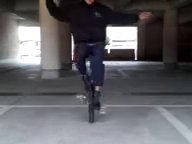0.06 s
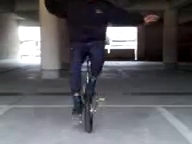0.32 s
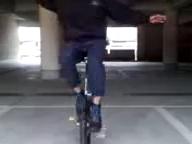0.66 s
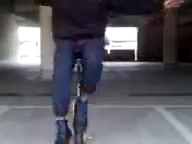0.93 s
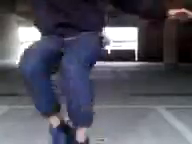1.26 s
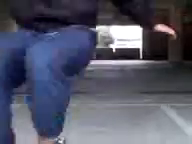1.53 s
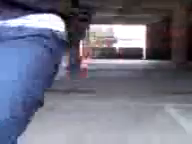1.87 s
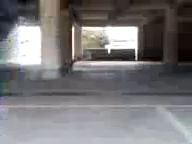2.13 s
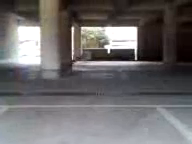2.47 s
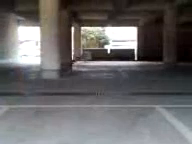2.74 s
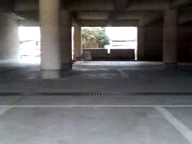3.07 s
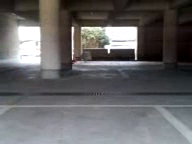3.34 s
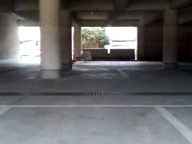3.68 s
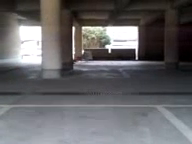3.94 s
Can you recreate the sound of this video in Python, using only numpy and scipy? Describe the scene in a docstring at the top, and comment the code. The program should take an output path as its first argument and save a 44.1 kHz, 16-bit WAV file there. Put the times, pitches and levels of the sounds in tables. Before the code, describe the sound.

A unicycle rolls closer in a concrete parking garage, its tyre crackling on grit with each pedal stroke while the frame ticks. Rubber squeaks close by at about 1.4 seconds and again, loudest, near 2.2 seconds, with a few knocks. Soft footfalls follow from 2.5 seconds, then last scuffs and ticks around 3 seconds. Everything echoes over a steady rush of room noise that continues to 4 seconds.

```python
"""A unicycle rolls past a microphone in a concrete parking garage full of steady air noise.
First the tyre crackles over grit and swells with each pedal stroke, while the loaded frame ticks.
From 1.4 s rubber scuffs close by in stick-slip squeaks, loudest near 2.2 s; then feet thud behind,
and last scuffs and ticks follow near 3 s. Throughout, the concrete reverberates, and the narrow-band
recorder ducks after each loud sound and slowly lets the room noise back up."""
import sys
import numpy as np
from scipy import signal
from scipy.fft import rfft, irfft, next_fast_len
from scipy.io import wavfile
from scipy.ndimage import uniform_filter1d

SR = 44100
rng = np.random.default_rng(int(sys.argv[2]) if len(sys.argv) > 2 else 0)


def transcribe(signal):
    """Save signal, clipped to [-1, 1], as a 16-bit WAV file at the path in sys.argv[1]."""
    frames = np.atleast_2d(signal).T
    limited = np.clip(frames, -1, 1)
    pcm = np.round(limited * 32767).astype(np.int16)
    wavfile.write(sys.argv[1], SR, pcm)


N = 176400

# Loudness of the rolling tyre. Each row: time in seconds, level in dB.
ROLL_LEVEL = [(0, -27.5), (.4, -27.5), (.7, -27), (1.28, -29), (1.45, -19.5), (1.65, -31.5), (2.05, -47.5),
              (2.25, -15), (2.45, -26.5), (2.8, -57), (3.15, -28), (3.6, -55), (4, -26.5)]
# Spectrum of the tread on grit. Each row: frequency in Hz, spectral density in dB.
TYRE_SPECTRUM = [(100, -18), (400, -6), (1000, -22), (1700, -10.5), (2100, -2), (2600, -3.5), (3000, -2),
                 (3350, 4.5), (3600, -2)]
# Pedal strokes. Each row: start in seconds, length in seconds, level in dB, relative ring level in dB.
PEDAL_STROKES = [(0, 0.12, -21, -12.5), (0.229, 0.28, -20.5, -12), (0.492, 0.1, -19, -9.5),
                 (0.795, 0.16, -21, 2), (1.06, 0.12, -22.5, -11), (1.635, 0.1, -21.5, -12)]
STROKE_RISE_S, RING_HZ, RING_SAG_HZ_PER_S, RING_WIDTH_HZ = 0.018, 3406, 2000, 170

# Rubber scuffs. Each row: start, rise, hold and release in seconds, level in dB, squeak pitch in Hz,
# relative scrape level in dB.
SCUFFS = [(1.372, 0.0015, 0.013, 0.035, -6.5, 3206, -11.5),
          (2.096, 0.0021, 0.024, 0.012, -9.5, 3043, -12.5), (2.17, 0.018, 0.01, 0.017, -1.5, 3206, -9.5),
          (2.921, 0.0052, 0.025, 0.18, -21, 2960, -16), (2.976, 0.011, 0.02, 0.036, -14.5, 2960, -9.5),
          (3.083, 0.012, 0.0037, 0.032, -17.5, 3060, -4)]
# Broad scrape under a squeak. Each row: frequency in Hz, spectral density in dB.
SCRAPE_SPECTRUM = [(60, -25), (300, 1.5), (650, -6), (1000, 1), (1350, 4), (1800, 1.5), (2400, 7.5),
                   (3500, -19.5)]
SLIP_RATE_HZ, SLIP_RISE_S, SLIP_SPREAD_DB, SLIP_DETUNE = 380, 0.00082, 2.4, 0.036

# Frame ticks. Each row: start in seconds, level in dB, relative level of the lower modes in dB.
TICKS = [(0.2357, -8, 1), (.244, -6.5, -1), (0.364, -12.5, -17), (0.444, -12.5, -4), (0.513, -11.5, -6.5),
         (0.54, -4.5, -10.5), (.554, -10, -10), (.750, -11, -9), (0.799, -2, -4.5), (1.0659, -10, 1.5),
         (1.089, -7, -5), (1.137, -4, -8), (1.2715, -12, -6.5), (1.2964, -9.5, -7.5), (1.3233, -1, -12),
         (1.3335, -3.5, -15.5), (1.35, -4, -15.5), (1.8614, -13, -3), (1.8637, -10, -5),
         (2.209, -6.5, -1.5), (2.9309, -3.5, -5.5), (2.9392, -4, -14), (2.9552, -9.5, -4),
         (2.9854, -1.5, -20), (2.988, 3, -16.5), (2.9966, 3.5, -10.5), (3.0172, -8, -2)]
# Main frame mode, lower once the rider is past. Each row: time in seconds, frequency in Hz.
FRAME_MAIN_MODE = [(1.4, 3312), (2.9, 2844)]
# Lower frame modes. Each row: frequency in Hz, relative level in dB.
FRAME_LOW_MODES = [(971, -4), (1600, -5.5), (2050, 5)]
TICK_RISE_S, TICK_DETUNE = 0.00085, 0.019

# Soft knocks, clacks and footfalls. Each row: start in seconds, level in dB, pitch in Hz,
# 60 dB decay time in seconds, relative slap level in dB, relative boom level in dB.
KNOCKS = [(0.482, -17, 275, 0.046, -1, -7.5), (0.7982, -16.5, 910, .06, -16.5, -25),
          (1.135, -18.5, 588, 0.12, -9.5, -9.5), (1.644, -16, 623, 0.029, 3.5, -10),
          (1.895, -26.5, 327, 0.28, -2.5, 1), (2.096, -10, 922, 0.036, -4, -21.5),
          (2.148, -5, 607, 0.017, 3, -30), (2.1969, -6, 1326, 0.041, -2.5, -25.5),
          (2.556, -18.5, 240, 0.17, -4.5, -4.5), (2.578, -23, 291, 0.054, -3, -5.5),
          (2.621, -27.5, 329, 0.089, -3.5, -3), (2.695, -14.5, 321, .11, 0.5, -15.5),
          (2.818, -29, 318, 0.16, -12.5, -4.5)]
# Slap of a sole. Each row: frequency in Hz, spectral density in dB.
SLAP_SPECTRUM = [(40, -26.5), (170, -12.5), (350, -10), (800, 0), (1350, 4), (1900, -9.5), (3300, -5)]
# Hollow boom under a knock. Each row: frequency in Hz, spectral density in dB.
BOOM_SPECTRUM = [(40, -19.5), (150, -9.5), (240, -5.5), (340, -2.5), (500, -5.5), (1000, -22.5),
                 (2000, -21.5)]
KNOCK_ATTACK_S, SLAP_T60_S, BOOM_T60_S = 0.001, 0.016, 0.34
THUD_WANDER_HZ, THUD_BASS_CUT_HZ = 18, 120

# Reverberation time of the garage. Each row: frequency in Hz, 60 dB decay time in seconds.
GARAGE_T60 = [(150, 0.97), (1000, 4.4), (3500, 1.0)]
NEAR_WET_DB, KNOCK_WET_DB = -10, -11.5
# Loudness of the room noise. Each row: time in seconds, level in dB.
AIR_LEVEL = [(0, -24.5), (.55, -25.5), (.95, -28), (1.3, -27), (1.55, -30), (2.05, -25.5), (2.3, -25),
             (2.5, -23), (2.69, -21.5), (2.73, -28.5), (2.93, -27), (3.2, -26), (3.32, -26.5), (3.6, -23),
             (4, -23)]
# Spectrum of the room noise. Each row: frequency in Hz, spectral density in dB.
AIR_SPECTRUM = [(22, -37), (50, -12.5), (100, -6), (180, -6.5), (320, 0), (550, 3.5), (1000, 5),
                (1450, 2.5), (1800, 3.5), (2200, 9), (2650, 2.5), (3400, 0.5)]

# Frequency response of the recorder. Each row: frequency in Hz, gain in dB.
RECORDER_BAND = [(18, -15.5), (45, 2.5), (3400, 1), (3650, -6), (3900, -14.5), (4350, -26.5), (4750, -55.5),
                 (5300, -100)]
INPUT_BAND_HZ, TOP_HZ = 4764, 15800
LIMIT_DB, DUCK_ATTACK_S, RECOVER_DB_PER_S, CLIP_LEVEL = -12.5, 0.012, 24, 0.4
# Thin, bright spits. Each row: start in seconds, level before filtering in dB.
SPITS = [(0.799, -23), (2.1868, -21), (2.1927, -19), (2.1955, -13), (2.99, -21.5)]
SPIT_LOW_HZ, SPIT_TOP_HZ, SPIT_T60_S = 1400, 14600, 0.00034


def tyre():
    """Rolling noise: tread strikes grit; each pedal stroke swells it and draws a squeaky ring."""
    t = clock()
    out = envelope(ROLL_LEVEL) * coloured(grains(per_second=1500, spread_db=2.5), TYRE_SPECTRUM)
    crunch = coloured(grains(per_second=3600, spread_db=-1.5), TYRE_SPECTRUM)
    flutter = unit_rms(filtered(rng.standard_normal(N), lambda hz: 1 / (1 + (hz / RING_WIDTH_HZ) ** 4)))
    for start, length, db, ring_db in PEDAL_STROKES:
        pitch = RING_HZ - RING_SAG_HZ_PER_S * np.clip(t - start, 0, length)  # sinks as the push eases
        ring = unit_rms(flutter * tone(pitch))
        swell = np.interp(t, [start, start + STROKE_RISE_S, start + length], [0, 1, 0])
        out += amp(db) * swell * (crunch + amp(ring_db) * ring)
    return out


def rubber_scuffs():
    """Stick-slip friction: rubber catches and lets go in an uneven pulse train over a broad scrape."""
    t, out = clock(), np.zeros(N)
    scrape = coloured(grains(per_second=3800, spread_db=8.0), SCRAPE_SPECTRUM)
    for start, rise, hold, release, db, hz, scrape_db in SCUFFS:
        slips = np.zeros(N)
        for k, (jitter, size, detune) in enumerate(rng.standard_normal(size=(80, 3))):
            slip = amp(SLIP_SPREAD_DB * size) * damped_pulse(hz * (1 + SLIP_DETUNE * detune), SLIP_RISE_S)
            add(slips, start + (k + 0.26 * jitter) / SLIP_RATE_HZ, slip)
        squeak = slips / np.std(slips[slips != 0])
        swell = np.interp(t, start + np.cumsum([0, rise, hold, release]), [0, 1, 1, 0]) ** 2
        out += amp(db) * swell * (squeak + amp(scrape_db) * scrape)
    return out


def frame_ticks():
    """Modal vibration: the loaded frame and cranks creak in single, heavily damped ticks."""
    out = np.zeros(N)
    for start, db, low_db in TICKS:
        pitch = np.interp(start, *np.transpose(FRAME_MAIN_MODE))
        main = damped_pulse(pitch * (1 + TICK_DETUNE * rng.standard_normal()), TICK_RISE_S)
        low = sum(amp(mode_db) * damped_pulse(hz * rng.lognormal(0, 0.053), TICK_RISE_S / 2)
                  for hz, mode_db in FRAME_LOW_MODES)
        add(out, start, amp(db) * (main + amp(low_db) * low))
    return out


def knocks():
    """Impact excitation: each contact leaves a wavering ring, a hollow boom and a slap to decay."""
    out, t = np.zeros(N), np.arange(SR // 2) / SR
    slap_noise = coloured(rng.standard_normal(N), SLAP_SPECTRUM)
    boom_noise = coloured(rng.standard_normal(N), BOOM_SPECTRUM)
    for start, db, hz, t60, slap_db, boom_db in KNOCKS:
        span = slice(round(start * SR), round(start * SR) + len(t))
        wander = unit_rms(uniform_filter1d(rng.standard_normal(len(t)), size=300))
        ring = amp(-60 * t / t60) * tone(hz + THUD_WANDER_HZ * wander)
        boom = boom_noise[span] * amp(boom_db - 60 * t / BOOM_T60_S)
        slap = slap_noise[span] * amp(slap_db - 60 * t / SLAP_T60_S)
        attack = 1 - np.exp(-t / KNOCK_ATTACK_S)
        add(out, start, amp(db) * ((ring + boom) * attack + slap))
    return filtered(out, lambda hz: (1j * hz / (1j * hz + THUD_BASS_CUT_HZ)) ** 2)


def garage_reverb(x):
    """Diffuse reverberation: reflections off bare concrete decay exponentially, mid pitches slowest."""
    hz, t, spectra = signal.stft(rng.standard_normal(SR * 2), SR, nperseg=256)
    decay = amp(-60 * t / curve_at(GARAGE_T60, hz)[:, None])
    tail = signal.istft(spectra * decay, SR, nperseg=256)[1]
    return signal.fftconvolve(x, tail / np.linalg.norm(tail))[:N]


def air_noise(patchy_db):
    """Diffuse field: the concrete smears distant traffic and ventilation into faintly patchy noise."""
    spectra = signal.stft(rng.standard_normal(N), nperseg=2048)[2]
    patches = uniform_filter1d(rng.standard_normal(spectra.shape), size=8, axis=0)  # across frequency
    patches = uniform_filter1d(patches, size=4, axis=1)  # across time
    noise = signal.istft(spectra * amp(patchy_db * unit_rms(patches)), nperseg=2048)[1][:N]
    return envelope(AIR_LEVEL) * coloured(noise, AIR_SPECTRUM)


def spits():
    """Short pulses have wide spectra: these overload-like spits reach far above the recorder's band."""
    out, t = np.zeros(N), np.arange(SR // 100) / SR
    for start, db in SPITS:
        add(out, start, amp(db - 60 * t / SPIT_T60_S))
    return filtered(out, lambda hz: np.exp(-(hz / SPIT_TOP_HZ) ** 20) / (1 + (SPIT_LOW_HZ / (hz + 1)) ** 8))


def damped_pulse(hz, rise):
    """Heavy damping: a few cycles swell for rise seconds and die at once."""
    t = np.arange(SR // 100) / SR
    return (t / rise * np.exp(1 - t / rise)) ** 2 * np.sin(2 * np.pi * hz * t)


def grains(per_second, spread_db):
    """Shot noise: tiny impacts of uneven size arrive at random."""
    impacts = (rng.random(N) < per_second / SR) * rng.standard_normal(N)
    return unit_rms(impacts * amp(spread_db * np.clip(rng.standard_normal(N), -2, 2)))


def tone(hz):
    """A sine whose phase is the integral of its frequency."""
    return np.sin(2 * np.pi * np.cumsum(hz) / SR)


def coloured(x, spectrum):
    """Spectral shaping, scaled to rms 1 within the recorder's band."""
    shaped = filtered(x, lambda hz: amp(curve_at(spectrum, hz)))
    return shaped / np.std(band_limited(shaped))


def band_limited(x):
    """Band-pass filtering by the recorder's response."""
    return filtered(x, lambda hz: amp(curve_at(RECORDER_BAND, hz)))


def filtered(x, response):
    """Linear filtering: the spectrum of x times a frequency response."""
    size = next_fast_len(N + SR // 2)
    return irfft(rfft(x, size) * response(np.fft.rfftfreq(size, 1 / SR)), size)[:N]


def curve_at(points, hz):
    """Interpolation of (Hz, value) points on a logarithmic frequency axis."""
    frequencies, values = np.transpose(points)
    return np.interp(np.log(hz + 1), np.log(frequencies + 1), values)


def envelope(points):
    """Gain per sample from (seconds, dB) points."""
    return amp(np.interp(clock(), *np.transpose(points)))


def amp(db):
    """Decibels as an amplitude ratio."""
    return 10 ** (np.asarray(db) / 20)


def unit_rms(x):
    """Normalisation to rms 1."""
    return x / np.sqrt(np.mean(x ** 2) + 1e-20)


def clock():
    """The time of every sample in seconds."""
    return np.arange(N) / SR


def add(out, start, sound):
    """Superposition of a sound from start seconds on."""
    part = out[max(round(start * SR), 0):][:len(sound)]
    part += sound[:len(part)]


def scene():
    """Superposition: scuffs, ticks and thuds with their reverberation, the tyre and the room noise."""
    near = rubber_scuffs() + frame_ticks()
    thuds = knocks()
    reverb = garage_reverb(amp(NEAR_WET_DB) * near + amp(KNOCK_WET_DB) * thuds)
    return (near + thuds + reverb + tyre() + air_noise(patchy_db=1.84))[None]


def record(dry):
    """Automatic gain control drops fast and recovers slowly; soft clipping, band and spits follow."""
    x = filtered(dry[0], lambda hz: hz < INPUT_BAND_HZ)
    power = np.abs(uniform_filter1d(x * x, size=220))  # 5 ms mean
    over_db = np.maximum(10 * np.log10(power + 1e-12) - LIMIT_DB, 0)
    recovery_db = RECOVER_DB_PER_S * clock()
    held_db = np.maximum.accumulate(over_db + recovery_db) - recovery_db  # each peak drains steadily
    lag = np.exp(-1 / (DUCK_ATTACK_S * SR))
    duck_db = signal.lfilter([1 - lag], [1, -lag], held_db)
    ducked = x * amp(-duck_db)
    clipped = ducked / (1 + (ducked / CLIP_LEVEL) ** 8) ** (1 / 8)
    return filtered(band_limited(clipped) + spits(), lambda hz: hz < TOP_HZ)[None]


dry = scene()
out = record(dry)
transcribe(out)
```